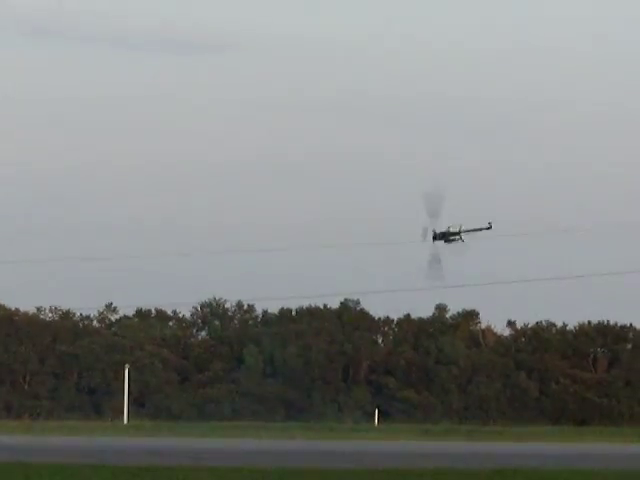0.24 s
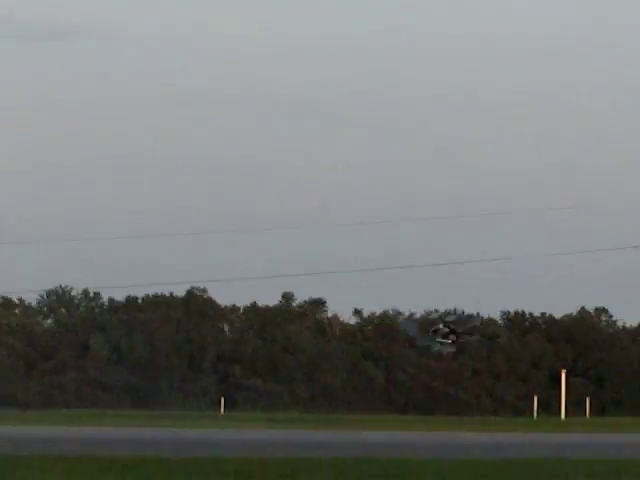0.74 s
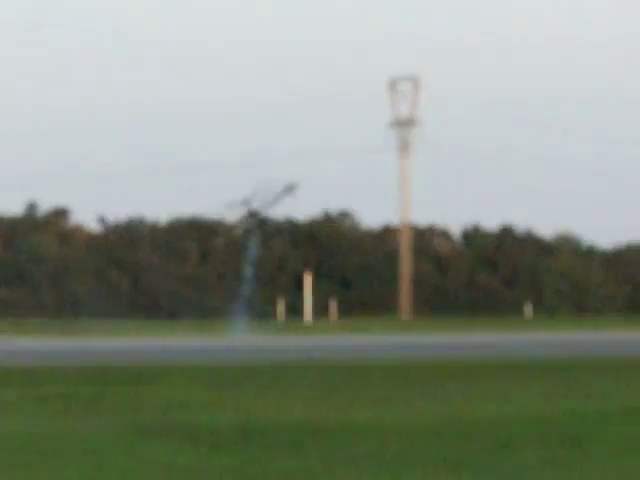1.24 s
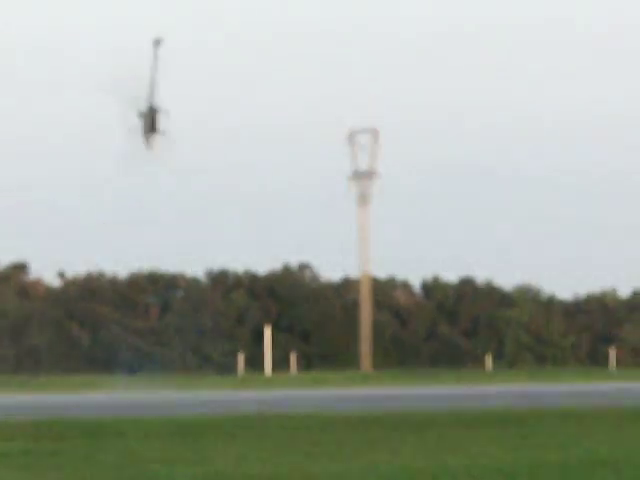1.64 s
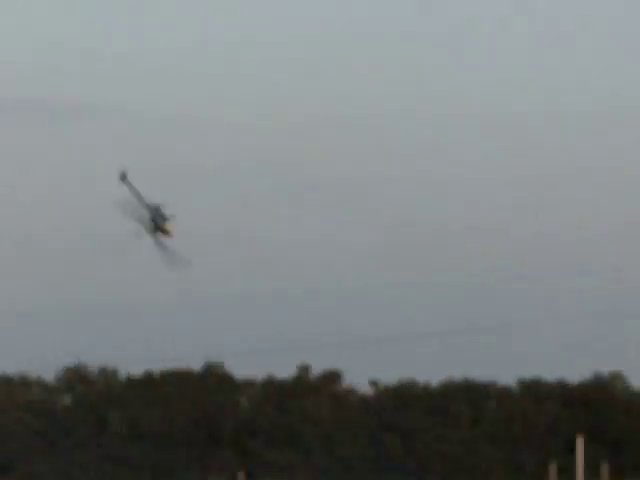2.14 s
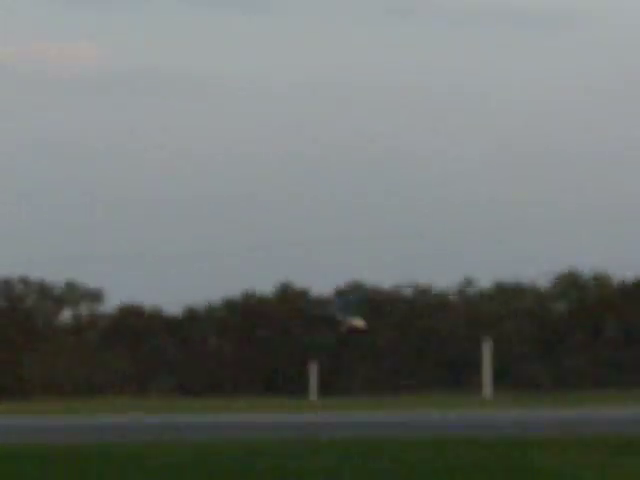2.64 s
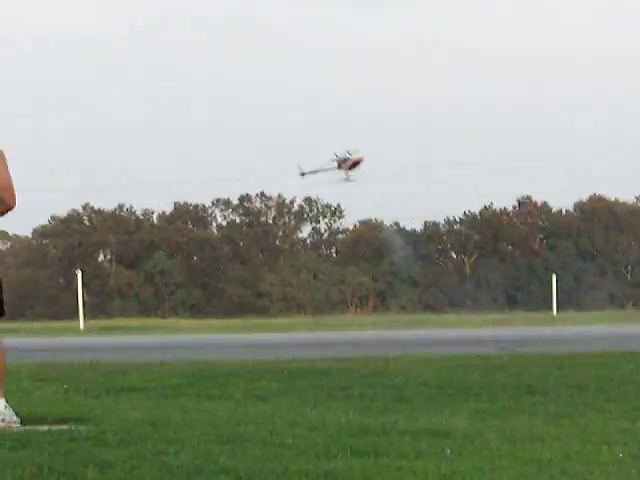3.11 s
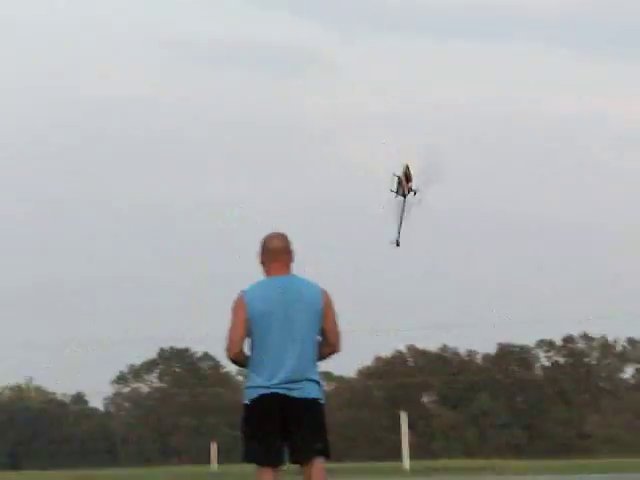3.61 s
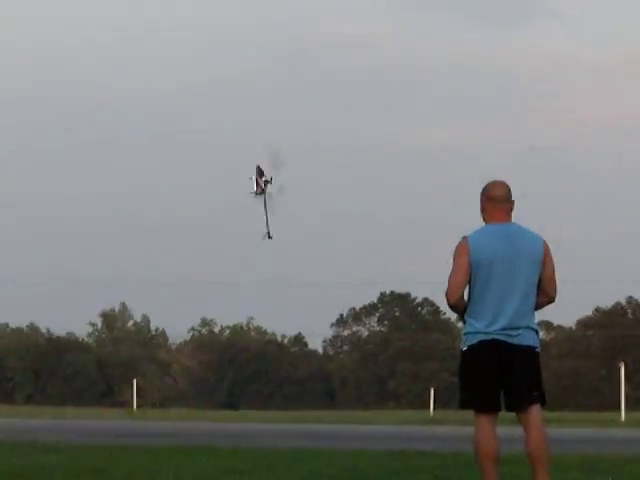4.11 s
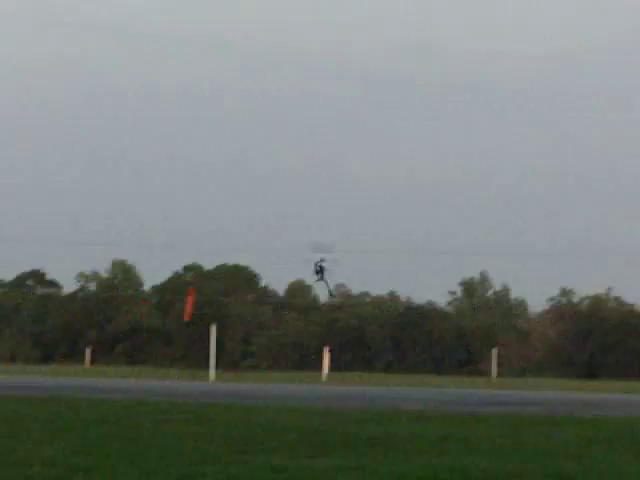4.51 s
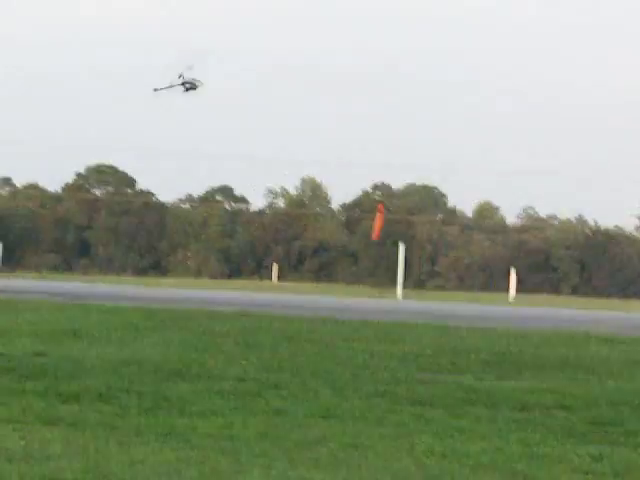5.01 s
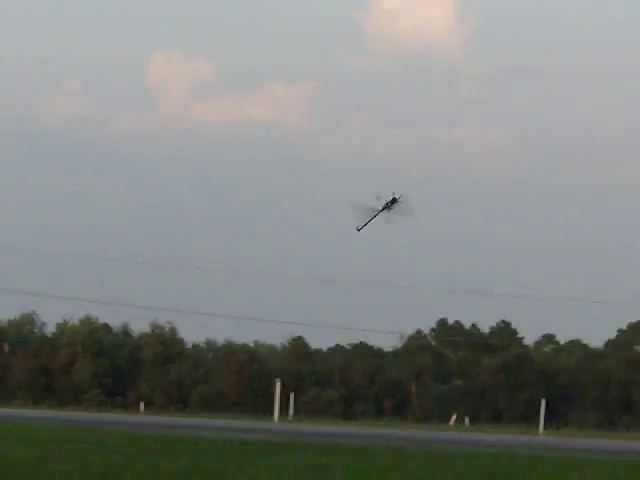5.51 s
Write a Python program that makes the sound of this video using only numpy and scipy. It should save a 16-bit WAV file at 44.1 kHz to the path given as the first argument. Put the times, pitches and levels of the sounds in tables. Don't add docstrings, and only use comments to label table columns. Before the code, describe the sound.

Raspy, metallic engine whine of a radio-controlled helicopter swooping outdoors, rising and dipping in pitch, with bursts of hard blade chopping and no pause.

```python
import sys
import numpy as np
from scipy import signal
from scipy.fft import rfft, irfft
from scipy.io import wavfile
from scipy.ndimage import uniform_filter1d

SR = 44100
rng = np.random.default_rng(int(sys.argv[2]) if len(sys.argv) > 2 else 0)


def waveform_to_disk(signal):
    frames = np.transpose(np.atleast_2d(signal))
    scaled = np.clip(frames, -1, 1) * 32767
    samples = np.round(scaled).astype(np.int16)
    wavfile.write(sys.argv[1], SR, samples)


def how_loud(loudness_db):
    steps = np.asarray(loudness_db, float) / 20
    return 10 ** steps


N = 253575
TIME, FRAME = np.arange(N) / SR, 512
MAIN_GEAR, TAIL_GEAR = 0.2305, 1.105
PULSE_SPREAD = 0.3

# t/s, firings per second as heard f/Hz, exhaust thump level/dB
CRANK = [(.085, 247, -35.5), (.645, 290.6, -29), (.956, 308.6, -27), (1.096, 281.1, -25.5),
         (1.236, 278, -19.5), (1.574, 296.1, -35), (1.733, 262.2, -39), (2.07, 254.7, -39),
         (2.458, 295.6, -35), (2.777, 309.5, -36), (3.057, 256.8, -31.5), (3.532, 290, -30),
         (3.709, 277.6, -31.5), (4.317, 272.6, -33.5), (4.566, 308.6, -33.5), (4.757, 261.3, -33.5),
         (5.263, 253.3, -31.5), (5.75, 305.9, -29.5)]
# f/Hz, level/dB
BODY_COLOUR = [(260, -24.5), (450, -25.5), (554, -12.5), (682, -17), (1590, -13.5), (2050, -8.5),
               (2470, -9), (2960, -2), (3350, -3), (4660, 3), (5200, -1), (5810, 0.5), (8380, -26.5),
               (10900, -69), (18400, -120)]
# f/Hz, level/dB
RUMBLE_COLOUR = [(20, -27), (50, -7.5), (150, 2.5), (300, -2), (420, -9), (800, -35.5)]


def evened(x):
    return x / np.sqrt(np.mean(x ** 2) + 1e-20)


def read(points, hz):
    f, value = np.transpose(points)
    return np.interp(np.log(hz + 1), np.log(f + 1), value)


def curves(rows, t=TIME):
    s, *columns = np.transpose(rows)
    return [np.interp(t, s, c) for c in columns]


def swells(rows, order=2):
    total = 0
    for s, half, *sizes in rows:
        total = total + np.outer(sizes, np.exp(-0.5 * ((TIME - s) / half) ** order))
    return total


def wander(rate_hz, count):
    knots = rng.standard_normal((count, 1200))
    smooth = uniform_filter1d(knots, max(int(200 / rate_hz), 2), 1)
    smooth = uniform_filter1d(smooth, max(int(100 / rate_hz), 2), 1)
    return [np.interp(TIME * 200, np.arange(1200), evened(row)) for row in smooth]


def shaped(x, gain):
    hz, t, z = signal.stft(x, SR, nperseg=FRAME, noverlap=FRAME * 3 // 4)
    return signal.istft(z * gain(hz[:, None], t), SR, nperseg=FRAME, noverlap=FRAME * 3 // 4)[1][..., :N]


def coloured(x, points):
    hz = np.fft.rfftfreq(N, 1 / SR)
    return evened(irfft(rfft(x) * how_loud(read(points, hz)), N))


def crank_hz():
    # t/s, half length/s, shift f/Hz
    bends = [
        (1.444, 0.068, 2.5),
        (1.895, 0.084, 11),
        (2.68, 0.13, 2.5),
        (3.191, 0.069, -2.5),
        (3.849, 0.063, 16),
        (4.208, 0.0785, -1.5),
        (4.964, 0.065, 5),
        (5.627, 0.095, 3.5),
             (0.798, 0.04766, 1.9), (1.033, 0.02513, -3.5), (1.119, 0.05212, -2.5), (1.233, 0.03736, 1.14),
            (1.704, 0.01513, -3), (2.617, 0.0487, 1.77), (2.721, 0.03436, -1.86), (2.849, 0.03413, 2.5),
            (2.997, 0.0337, -1.2), (3.077, 0.03595, 2.5), (3.753, 0.0371, 1.27), (3.966, 0.0345, 1.67),
            (4.529, 0.02502, -2.5), (4.56, 0.1, -2), (4.846, 0.0718, 2), (5.25, 0.033, 1.37)]
    inertia_s = 0.03
    return uniform_filter1d(curves(CRANK)[0], round(inertia_s * SR)) + swells(bends)[0]


def engine(turns):
    part_hz = [2000, 3050, 4400, 5900]
    top_db = [4, 1, 3.5, 0]
    rear_db = [6.5, 0.5, 2, 2.5]
    # t/s, nearness level/dB, top towards the camera [-1.2..2.5], tail towards the camera [-1.2..1.2]
    flight = [(0, -1.5, 0.7, 0.44), (.34, -1, 2, 0.0047), (.67, 4, 0.5, -0.61), (.82, -0.5, -0.2, 1.2),
              (1.01, 4.5, 0.1, -0.34), (1.2, 5.5, -1.2, -0.11), (1.52, 3, 0.3, -0.18),
              (1.7, -2.5, 2.5, -0.83), (2.05, 0.5, 0.65, -1.1), (2.61, 0, -0.4, -0.43),
              (3.12, -1.5, -0.4, -0.36), (3.43, 3, 0.35, 0.18), (3.6, -0.5, 1.4, -0.64),
              (3.95, -2.5, 0.7, 1), (4.43, -0.5, 0.3, -0.082), (4.66, -1.5, 0.96, 0.83),
              (4.95, 3, -1.15, -1.2), (5.75, 4, 0.1, 0.023)]
    # t/s, level/dB
    outlet_level = [(0, -46.5), (.5, -42.5), (1, -48.5), (1.4, -37), (1.8, -40.5), (2.3, -40), (2.8, -50.5),
                    (3.2, -44.5), (3.5, -37), (4.1, -42), (4.5, -50), (4.9, -47.5), (5.3, -42.5),
                    (5.75, -30.5)]
    outlet_share = [-1.5, -1.5, -1.2, 0.13, -1.2]

    fades = wander(rate_hz=9.9, count=32)
    ring = np.zeros(N)
    for k in range(6, 32):
        ring += how_loud(1.5 * fades[k]) * np.cos(2 * np.pi * k * turns + PULSE_SPREAD * k ** 2)
    hiss = (0.66 + np.exp(-(turns % 1) / 0.09)) * rng.standard_normal(N)
    drive = evened(ring) + how_loud(2.0) * evened(uniform_filter1d(hiss, size=4))

    def parts(hz, t):
        near_db, top, rear = curves(flight, t)
        facing_db = near_db + np.outer(top_db, top) + np.outer(rear_db, rear)
        share = np.array([np.interp(hz[:, 0], part_hz, row) for row in np.eye(4)])
        return how_loud(read(BODY_COLOUR, hz) + share.T @ facing_db)

    thump = np.sqrt(2) * how_loud(curves(CRANK)[1]) * np.cos(2 * np.pi * turns)
    outlet = np.zeros(N)
    for k, db in enumerate(outlet_share, 2):
        outlet += how_loud(db + 2.5 * fades[k + 25]) * np.cos(2 * np.pi * k * turns + 1.268 * k ** 2)
    return how_loud(-18.5) * evened(shaped(drive, parts)) + thump + how_loud(curves(outlet_level)[0]) * outlet


def beams(turns):
    # t/s, overtone number, half
    # length/s, level/dB
    glints = [(0.073, 7, 0.05, -29.5), (0.191, 11, 0.088, -23), (0.198, 12, 0.13, -24),
              (0.216, 9, 0.15, -28.5), (0.218, 10, 0.093, -26.5), (0.4, 8, 0.089, -27),
              (0.466, 10, 0.05, -25), (0.565, 11, 0.085, -27.5), (0.579, 6, 0.23, -31.5),
              (0.66, 12, 0.03, -26.0), (0.715, 7, 0.064, -25.5), (0.768, 5, 0.19, -37.0),
              (0.882, 9, 0.051, -40.5), (1.127, 10, 0.23, -38), (1.188, 12, 0.032, -28),
              (1.196, 11, 0.131, -22.5), (1.217, 7, 0.134, -30), (1.265, 8, 0.051, -26.5),
              (1.35, 6, 0.073, -27), (1.511, 10, 0.051, -29.5), (1.608, 7, 0.059, -24.5),
              (1.873, 11, 0.12, -32.5), (2.075, 12, 0.17, -37.5), (2.33, 8, 0.077, -30.5),
              (2.449, 10, 0.042, -23), (3.47, 8, 0.066, -25), (3.576, 10, 0.083, -31.5),
              (3.82, 12, 0.094, -31), (4.452, 7, 0.047, -24.5), (4.463, 10, 0.059, -29.5),
              (4.464, 6, 0.27, -32), (4.55, 5, 0.117, -35), (4.67, 7, 0.39, -33.5),
              (4.78, 11, 0.11, -30.5), (4.784, 12, 0.035, -30), (4.961, 8, 0.22, -27),
              (5.026, 9, 0.24, -36.5), (5.365, 11, 0.074, -30), (5.408, 10, 0.043, -28),
              (5.619, 7, 0.081, -23), (5.633, 10, 0.047, -14), (5.637, 12, 0.1, -27),
              (5.678, 6, 0.38, -29), (5.75, 5, 0.25, -38),
              (0.118, 14, 0.058, -21), (0.14, 13, 0.052, -23), (0.448, 14, 0.1, -25.5),
            (0.546, 13, 0.091, -33), (0.737, 15, 0.051, -28.5), (0.913, 14, 0.043, -27),
            (0.934, 15, 0.067, -23), (1.287, 13, 0.11, -29.5), (1.309, 15, 0.025, -25),
            (1.439, 14, 0.088, -19), (1.613, 14, 0.019, -19.5), (1.668, 13, 0.027, -23.5),
            (1.767, 15, 0.045, -9.5), (1.971, 15, 0.023, -9.5), (2.15, 15, 0.043, -22),
            (2.424, 14, 0.033, -20.5), (2.46, 15, 0.041, -20), (2.601, 15, 0.03, -21),
            (2.711, 15, 0.089, -23.5), (3.373, 14, 0.031, -23.5), (3.549, 14, 0.107, -21),
            (3.589, 15, 0.039, -25), (3.59, 13, 0.047, -27), (3.651, 14, 0.012, -17.5),
            (3.934, 13, 0.024, -30), (3.955, 14, 0.022, -15.5), (4.084, 15, 0.066, -12.5),
            (4.11, 14, 0.029, -25), (4.314, 15, 0.054, -22), (4.392, 14, 0.045, -33.5),
            (4.512, 15, 0.054, -18.5), (4.722, 13, 0.053, -23.5), (4.743, 15, 0.029, -22),
            (4.753, 14, 0.11, -30), (5.527, 14, 0.048, -30), (5.65, 13, 0.148, -28),
            (5.735, 15, 0.031, -19), (5.739, 14, 0.052, -34.5),
              (0.076, 20, 0.022, -15.5), (0.134, 19, 0.051, -31.5), (0.17, 18, 0.033, -18),
              (0.401, 18, 0.057, -25.5), (0.457, 20, 0.07, -18.5), (0.488, 21, 0.015, -29),
              (0.644, 19, 0.023, -25.5), (0.706, 20, 0.061, -24), (0.881, 21, 0.096, -35.0),
              (1.02, 19, 0.2, -42.5), (1.05, 20, 0.029, -21.5), (1.231, 20, 0.018, -23.5),
              (1.233, 18, 0.041, -32.5), (1.335, 20, 0.031, -13), (1.582, 19, 0.036, -29),
              (1.671, 20, 0.012, -27.5), (1.694, 21, 0.03, -19.5), (1.724, 18, 0.019, -23.5),
              (1.841, 18, 0.18, -34.5), (1.908, 20, 0.39, -30), (1.924, 21, 0.181, -30.5),
              (2.048, 19, 0.031, -36.5), (2.274, 19, 0.018, -23.5), (3.095, 18, 0.13, -33),
              (3.12, 19, 0.035, -31.5), (3.288, 18, 0.051, -25), (3.69, 20, 0.082, -20),
              (3.84, 21, 0.026, -24), (3.954, 19, 0.23, -26), (4.04, 19, 0.028, -25.5),
              (4.06, 20, 0.033, -21), (4.189, 21, 0.19, -34.5), (4.398, 20, 0.065, -15.5),
              (4.91, 18, 0.137, -35), (5.136, 18, 0.039, -30), (5.265, 20, 0.032, -22.5),
              (5.341, 21, 0.3, -35.5), (5.376, 19, 0.23, -33.5), (5.421, 18, 0.042, -16.5),
              (5.498, 20, 0.155, -27),
              (0.207, 17, 0.044, -34), (0.479, 16, 0.29, -24.5), (0.503, 17, 0.051, -15.5),
              (0.638, 17, 0.019, -25.5), (1.034, 17, 0.011, -24.5), (1.04, 16, 0.02, -17.5),
              (1.226, 17, 0.044, -19.5), (1.305, 16, 0.031, -15), (1.403, 17, 0.024, -29),
              (1.435, 16, 0.033, -10.5), (1.578, 16, 0.032, -32.5), (1.646, 17, 0.018, -24.0),
              (1.759, 17, 0.023, -18), (1.781, 16, 0.045, -16), (1.96, 17, 0.014, -36.5),
              (2.102, 16, 0.12, -24), (2.308, 17, 0.076, -24), (2.334, 16, 0.025, -22),
              (2.632, 16, 0.037, -24), (2.912, 16, 0.029, -21), (2.974, 17, 0.034, -29),
              (3.308, 17, 0.04, -19.5), (3.447, 17, 0.044, -31), (3.451, 16, 0.048, -21.5),
              (3.567, 16, 0.094, -20), (3.651, 17, 0.025, -14), (3.742, 17, 0.019, -19),
              (3.95, 16, 0.02, -21), (4.053, 17, 0.16, -24), (4.104, 16, 0.042, -21.5),
              (4.418, 16, 0.038, -19.5), (4.885, 17, 0.18, -23.5), (5.18, 17, 0.033, -27),
              (5.36, 17, 0.017, -29.0), (5.54, 17, 0.045, -25), (5.577, 16, 0.044, -29.5),
              (0.246, 24, 0.037, -41.5), (0.363, 23, 0.075, -33), (0.476, 22, 0.097, -31.5),
               (1.052, 22, 0.019, -27), (1.251, 23, 0.11, -32), (1.311, 22, 0.056, -36.5),
               (2.02, 24, 0.036, -40), (2.308, 22, 0.029, -31.5), (3.407, 22, 0.04, -27),
               (3.69, 22, 0.047, -25), (3.965, 22, 0.054, -26), (4.371, 22, 0.025, -24.5),
               (4.935, 25, 0.049, -33), (5.11, 24, 0.18, -40.5), (5.186, 23, 0.19, -42.5),
               (5.447, 22, 0.181, -34.5),
              (2.078, 8, 0.079, -37),
        (2.492, 5, 0.12, -38.5),
        (3.102, 8, 0.1, -35),
        (5.2, 20, .03, -25.5),
        (5.496, 10, 0.1, -30.5),
    ]

    out = np.zeros(N)
    flutter = np.array(wander(rate_hz=41.0, count=32))
    flutter = flutter - uniform_filter1d(flutter, size=SR // 20, axis=1)
    for s, overtone, half, db in glints:
        k = round(overtone)
        near = slice(max(round((s - 3 * half) * SR), 0), round((s + 3 * half) * SR))
        level = how_loud(db + 0.14 + 0.25 * overtone * np.tanh(flutter[k][near]))
        swell = level * np.exp(-0.5 * ((TIME[near] - s) / half) ** 2)
        out[near] += np.sqrt(2) * swell * np.cos(2 * np.pi * k * turns[near] + PULSE_SPREAD * k ** 2)
    return out


def rotor(turns):
    # t/s, thrust aimed at the camera level/dB, blades cutting their own wake level/dB
    effort = [(0, -27, -34.5), (.17, -30.5, -35), (.43, -26, -33.5), (.82, -24, -25.5), (.94, -33.5, -32),
              (1.38, -28.5, -31), (1.57, -18.5, -32), (1.76, -25.5, -38), (2.35, -34, -40.5),
              (2.8, -36, -36.5), (3.17, -47.5, -40.5), (3.5, -25, -32), (3.78, -32, -33.5),
              (4.03, -26, -29), (4.5, -33.5, -29.5), (4.88, -37, -39), (5.2, -23.5, -32.5),
              (5.75, -29.5, -36.5)]
    # t/s, half length/s, thrust gain level/dB, wake gain level/dB
    pulls = [(.03, 0.055, 0.5, 3), (.27, 0.043, -4, 4), (.62, 0.079, 0, -3), (1.01, 0.043, 10, 5),
             (1.23, 0.047, 4, 4), (1.65, 0.066, -2, 14.5), (2.885, 0.047, 11, 12.5), (3.08, 0.078, 7.5, 1),
             (3.57, 0.1, 5, 8), (3.88, 0.061, 2, 3), (4.51, 0.022, -9, 1.5), (4.65, 0.087, 11.5, 10.5),
             (4.8, 0.051, 7, -4.5), (5.5, 0.056, 1.5, 1), (5.75, 0.034, 6, 8.5)]
    # t/s, chop over swish level/dB
    edge_on = [(0, -8), (.4, -3), (.75, 4), (1, -2), (1.2, -6), (1.6, -4), (1.9, -14), (2.55, -18),
               (2.7, -7), (2.85, -20), (3.2, -13), (3.7, -5), (3.9, 0), (4.08, 2.5), (4.22, 2), (4.47, 3),
               (4.65, -7), (4.9, -14), (5.75, -14)]
    # t/s, level/dB
    stall = [(0, -3.5), (.12, 4), (.5, -0.5), (.9, -5.5), (1.15, -5), (1.45, -10.5), (1.65, -0.5),
             (1.9, 5.5), (2.5, 2.5), (2.95, -4), (3.3, 1), (3.9, 3), (4.4, -4.5), (4.65, -5.5), (4.88, 4),
             (5.25, 4), (5.75, 10.5)]
    # f/Hz, level/dB
    slap_colour = [(100, 3.5), (130, 5.5), (200, -1), (270, -2.5), (330, -7.5), (420, -31), (700, -29.5),
                   (1500, -11)]
    # f/Hz, level/dB
    swish_colour = [(300, -3.5), (430, -10), (560, -8), (1000, 1.5), (1500, 2), (2500, -52), (5000, -0.5)]

    beat_db, slap_db = curves(effort) + swells(pulls, order=6)
    chop_db = curves(edge_on)[0]
    swish_db = -33.5 + 0.46 * (slap_db + 29.5) + curves(stall)[0]
    passes = MAIN_GEAR * turns + 0.2768
    hz = MAIN_GEAR * np.gradient(turns) * SR

    beat = np.cos(2 * np.pi * passes + 1.8)
    beat += how_loud(-22.0) * np.cos(np.pi * passes) + how_loud(-19.5) * np.cos(3 * np.pi * passes)
    slap = np.zeros(N)
    for k in range(2, 22):
        slap -= how_loud(read(slap_colour, k * hz)) * np.cos(2 * np.pi * k * passes)
    gate = np.exp(1.1 * (np.cos(2 * np.pi * passes) - 1))

    cycle = np.linspace(0, 1, 2049)
    chop_shape = sum(np.cos(2 * np.pi * k * cycle + 1.9 * np.sqrt(k)) for k in range(6, 48))
    chop = np.interp((passes + 0.1213) % 1, cycle, chop_shape)
    chop = evened(chop * how_loud(1.1 * wander(rate_hz=40, count=1)[0]))
    tip_noise = evened((0.8 + gate) * rng.standard_normal(N))
    swish = coloured(tip_noise + how_loud(chop_db) * chop, swish_colour)

    crack = coloured(gate ** 3 * rng.standard_normal(N), BODY_COLOUR)
    wake = how_loud(-4.0) * coloured(rng.standard_normal(N), RUMBLE_COLOUR)
    slapping = evened(slap) + how_loud(2.5) * how_loud(0.35 * (slap_db + 28.0)) * crack + wake
    tips = swish + how_loud(chop_db - 23.0) * chop
    return np.sqrt(2) * how_loud(beat_db) * beat + how_loud(slap_db - 3.0) * slapping + how_loud(swish_db + 3.5) * tips


def tail(turns):
    # t/s, level/dB
    hum_level = [(0, -39), (.5, -44.5), (1, -30), (1.5, -47), (2, -60), (2.6, -39.5), (3, -40), (3.4, -42),
                 (4, -34), (4.5, -36.5), (5, -33.5), (5.4, -36), (5.75, -35)]
    passes = TAIL_GEAR * turns
    hum = np.cos(2 * np.pi * passes) + how_loud(-25.0) * np.cos(4 * np.pi * passes)
    return how_loud(curves(hum_level)[0] + 2.0 * wander(rate_hz=16.0, count=1)[0]) * hum


def stirred_air(hz, t):
    eddies = rng.standard_normal((4, len(hz), len(t)))
    eddies = uniform_filter1d(uniform_filter1d(eddies, size=4, axis=1), size=24, axis=2)
    eddies = evened(eddies)
    depth = np.clip(0.04 + 0.13 * hz / 5000, 0, 1)
    opposite = np.array([1, -1])[:, None, None]
    return 1 + depth * (eddies[0] + 1j * eddies[2]) * opposite


def breeze():
    noise = rng.standard_normal((2, N))
    return how_loud(-50.0) * np.array([coloured(row, RUMBLE_COLOUR) for row in noise])


def ground(hz, t):
    # t/s, first notch f/Hz, echo share [0-1]
    height = [(0, 3410, 0), (.6, 2250, 0.12), (1, 3400, 0.14), (1.5, 2400, 0.1), (1.75, 1620, 0.3),
              (2.1, 1110, 0.6), (2.35, 1590, 0.83), (2.6, 2850, 0.2), (2.95, 3980, 0.05), (3.3, 1920, 0.5),
              (3.6, 1675, 0.1), (4.05, 1760, 0.9), (4.25, 2480, 0.4), (4.5, 3560, 0), (4.8, 3330, 0.1),
              (5, 3280, 0.7), (5.25, 2080, 0.5), (5.5, 1555, 0)]
    notch_hz, share = curves(height, t)
    echo = np.clip(share, 0, 0.95) * np.clip(hz / 900 - 0.4, 0, 1) * np.exp(-(hz / 4500) ** 2)
    return (1 - echo * np.exp(-2j * np.pi * hz / notch_hz)) / np.sqrt(1 + echo ** 2)


def snaps():
    # t/s, peak level/dB
    strikes = [(0.6862, -6), (0.7037, -10), (0.7472, -12), (0.834, -4.5), (1.0058, -2.5), (1.0186, 7),
               (1.683, -6.5), (1.8854, -10.5), (2.118, -8), (2.8424, -1), (2.858, -3.5), (2.8726, -5.5),
               (2.8864, -1), (2.902, -11), (2.9165, -18), (2.933, -13.5), (4.511, -4.5), (4.6527, -2),
               (5.315, -8)]
    decay_s = 0.0013
    puff = np.zeros(N)
    for s, db in strikes:
        puff += how_loud(db) * (TIME >= s) * np.exp(-np.maximum(TIME - s, 0) / decay_s)
    bright = signal.butter(2, [2600, 6500], "bandpass", fs=SR, output="sos")
    return how_loud(-5) * signal.sosfilt(bright, puff * rng.standard_normal(N))


def scene():
    turns = np.cumsum(crank_hz()) / SR
    firing = turns + 0.0092 * wander(rate_hz=44.0, count=1)[0]
    shadow = 1 + 0.089 * np.cos(2 * np.pi * MAIN_GEAR * turns + 2.7)
    machine = shadow * engine(firing) + rotor(turns) + tail(turns)
    near = shaped(machine, ground) + shadow * beams(firing) + snaps()
    return shaped(np.array([near, near]), stirred_air) + breeze()


def ports(hz, t):
    # f/Hz, level/dB
    port_level = [(60, .5), (1300, 0.5), (1800, 1.5), (2100, 6), (2500, -3.5), (3100, -10), (3500, -3.5),
                  (4000, -6.5), (4700, -10), (4950, -9), (5200, 1.5), (5900, 11.5), (6400, 1.5), (7200, 10),
                  (8000, -4.5)]
    # f/Hz, lead [radians]
    port_lead = [(60, -.15), (200, 0), (1200, 0), (1640, -0.74), (1900, 0), (2400, -1.2), (2900, -1.07),
                 (3500, .4), (4450, 0), (5150, 2), (5600, 1.45), (6250, -.35), (6700, 0), (7400, -.75)]
    half = how_loud(read(port_level, hz) / 2) * np.exp(0.5j * read(port_lead, hz))
    return np.array([half, 1 / half]) / np.sqrt((abs(half) ** 2 + abs(half) ** -2) / 2)


def band_limit(x):
    return signal.sosfilt(signal.butter(12, 8530, fs=SR, output="sos"), x)


def record(dry):
    heard = shaped(dry, ports)
    limited = signal.sosfilt(signal.cheby2(10, 60, 9600, fs=SR, output="sos"), heard)
    power = uniform_filter1d((limited ** 2).max(0), size=900)
    power_db = 10 * np.log10(abs(power) + 1e-9)
    limited = limited / how_loud(0.4 * np.maximum(power_db + 9.5, 0))
    return band_limit(np.clip(limited, -0.99, 0.99))


dry = scene()
out = record(dry)
waveform_to_disk(out)
```